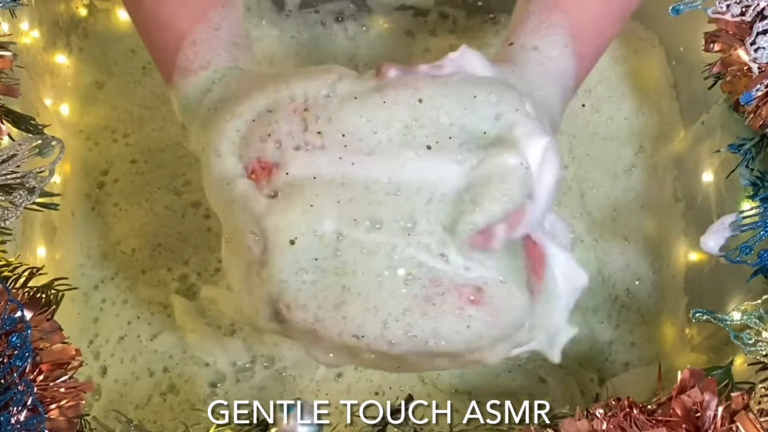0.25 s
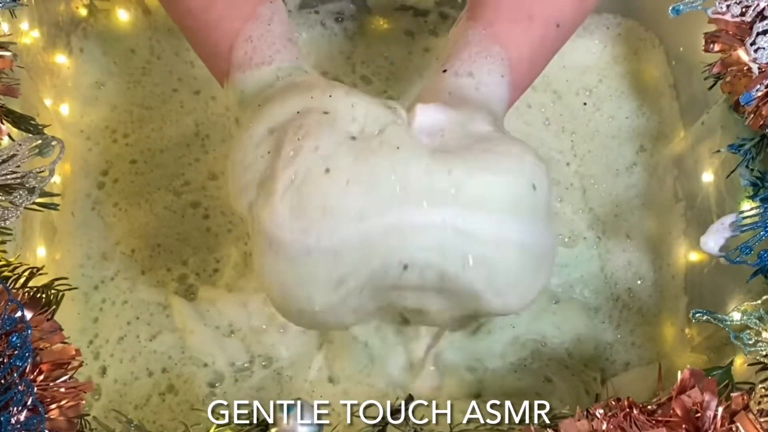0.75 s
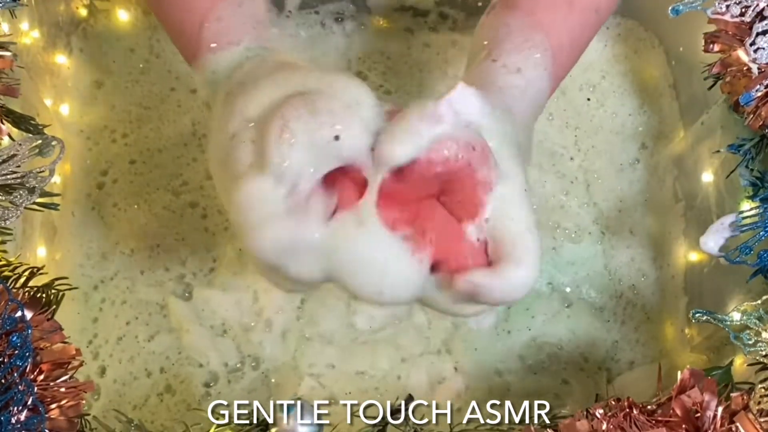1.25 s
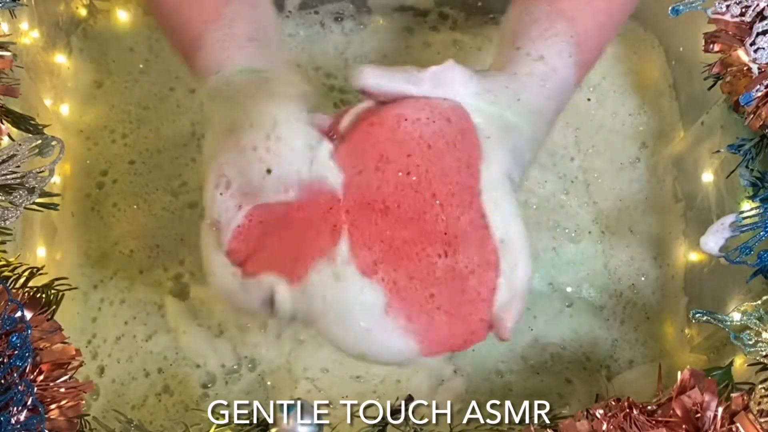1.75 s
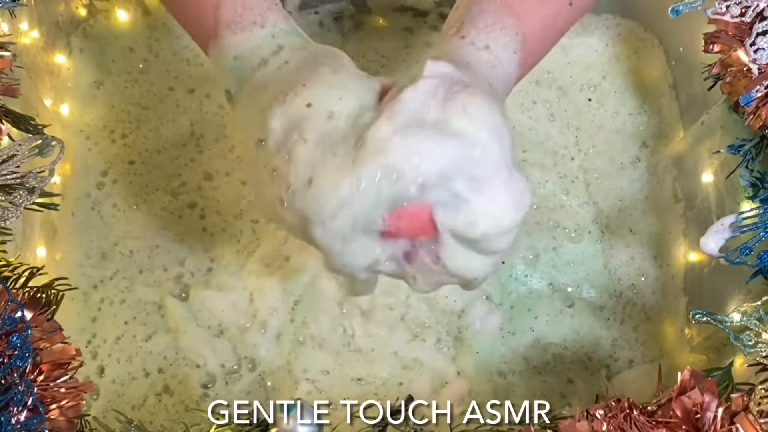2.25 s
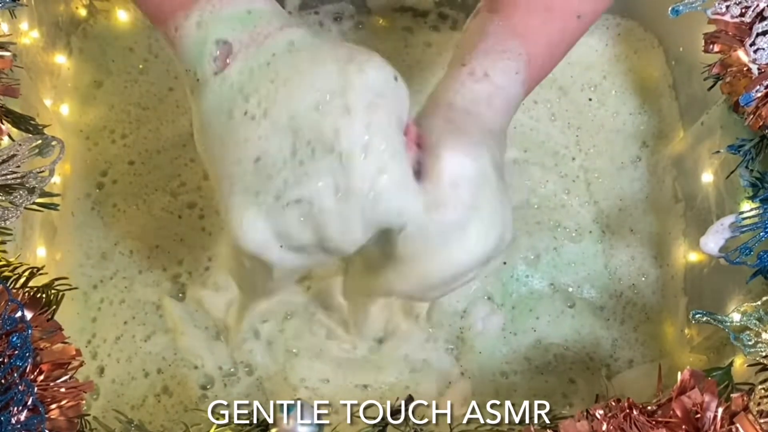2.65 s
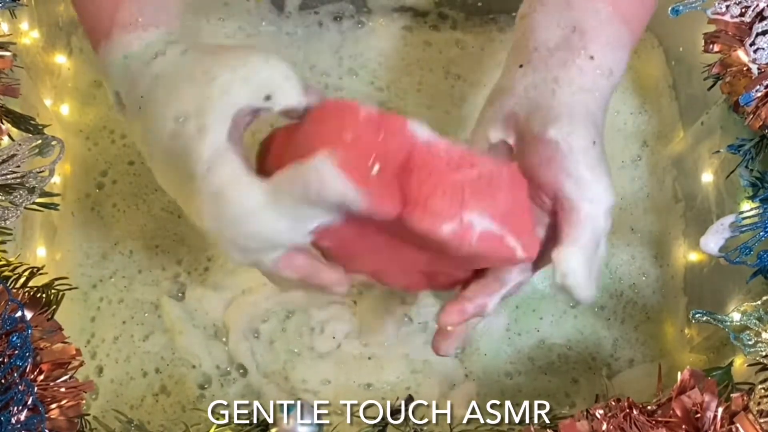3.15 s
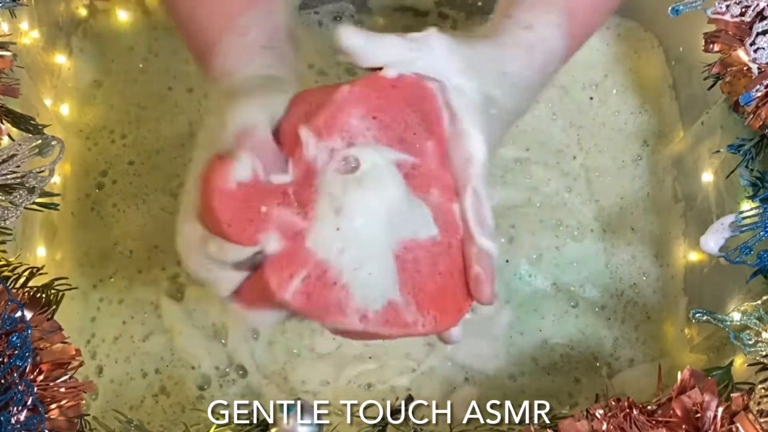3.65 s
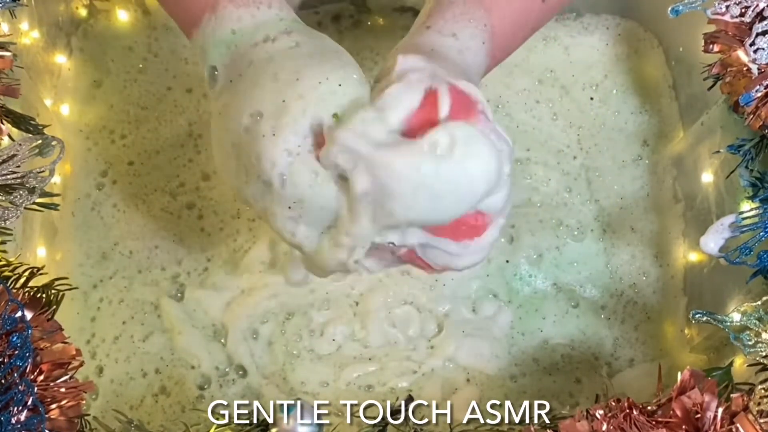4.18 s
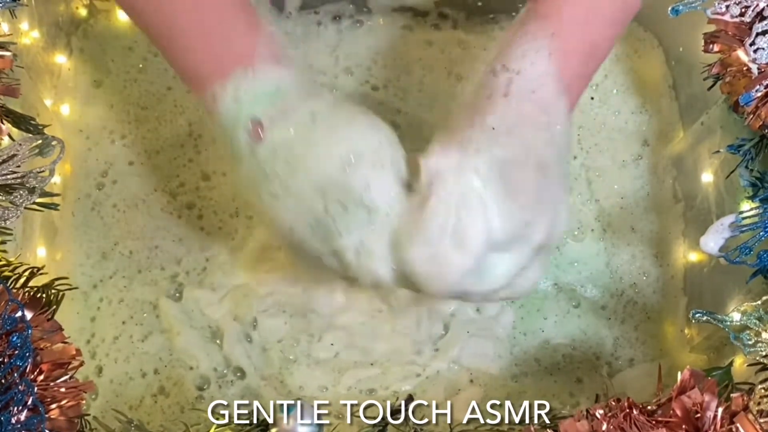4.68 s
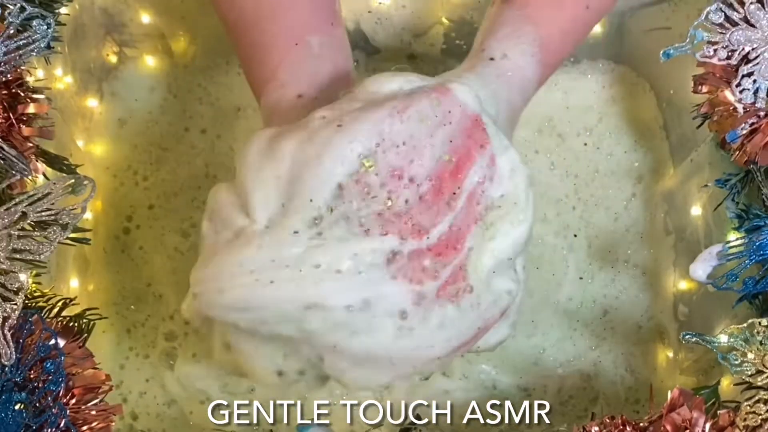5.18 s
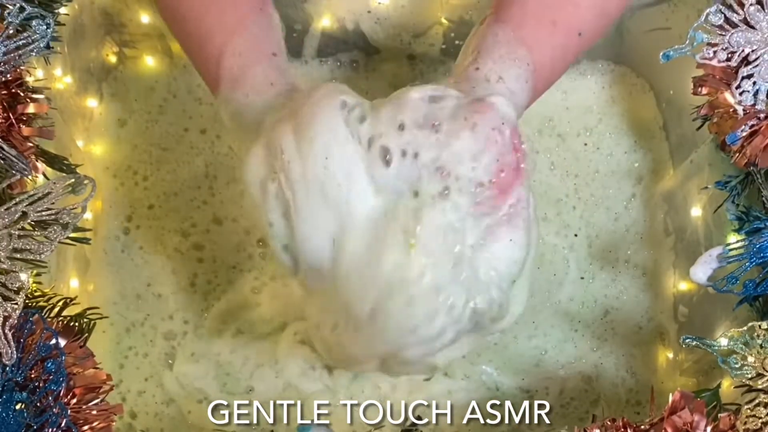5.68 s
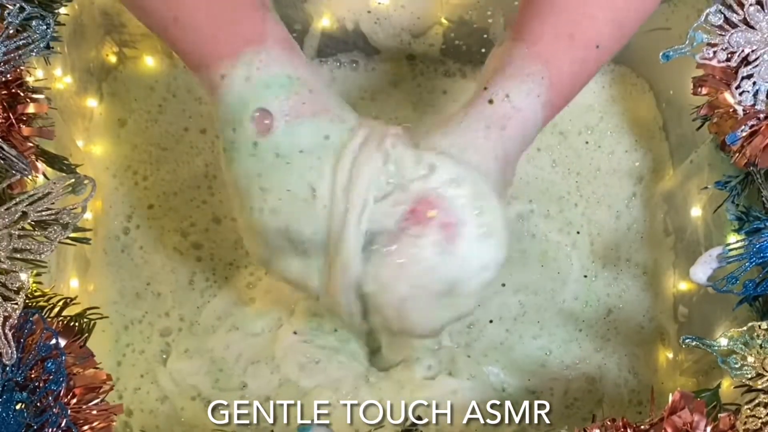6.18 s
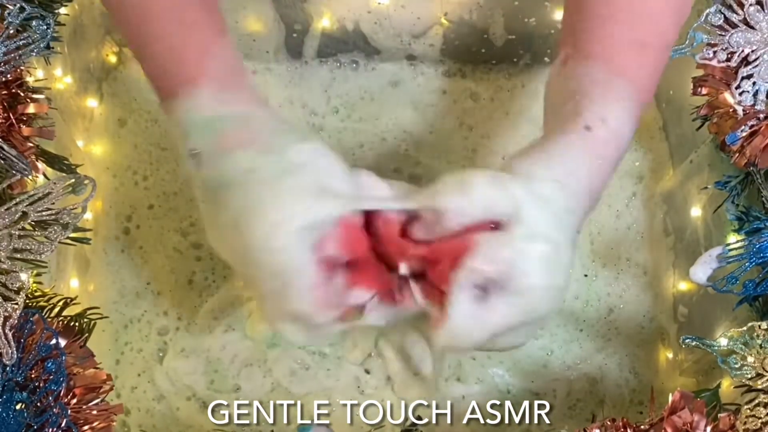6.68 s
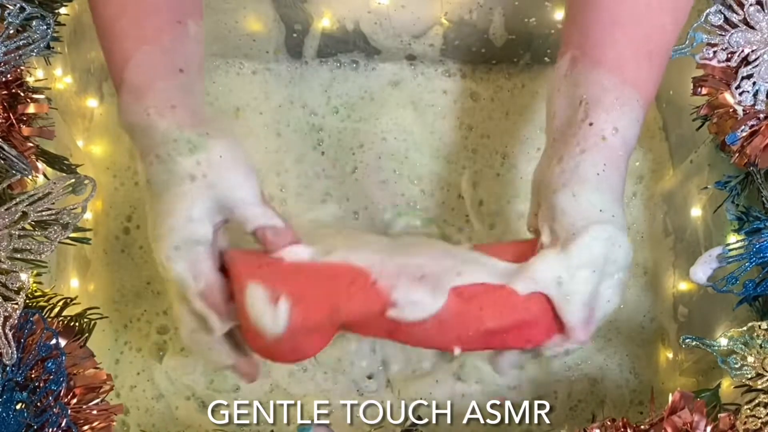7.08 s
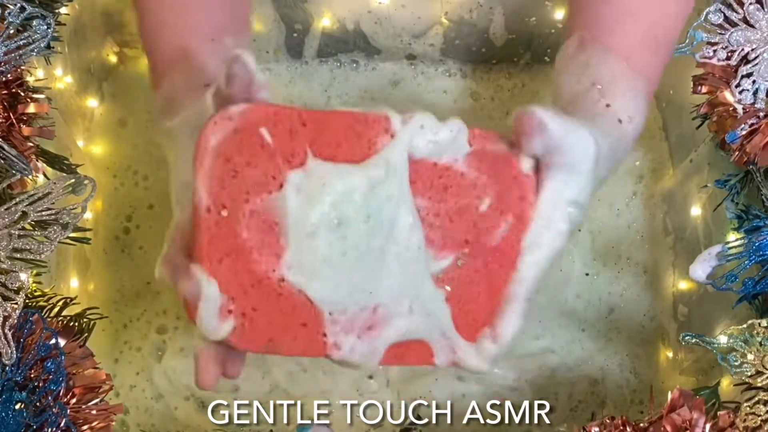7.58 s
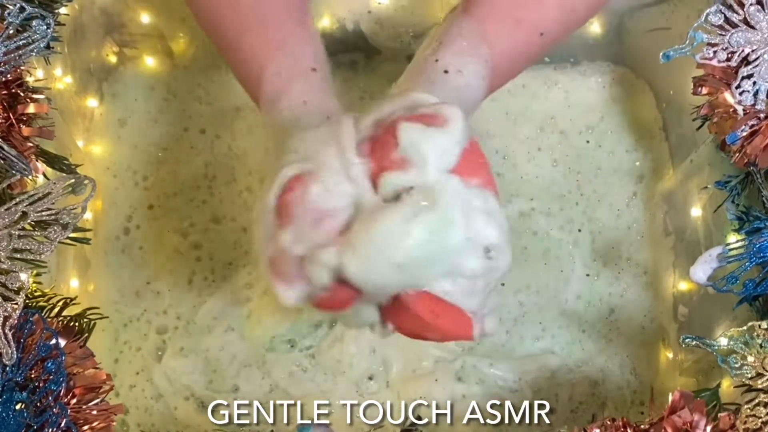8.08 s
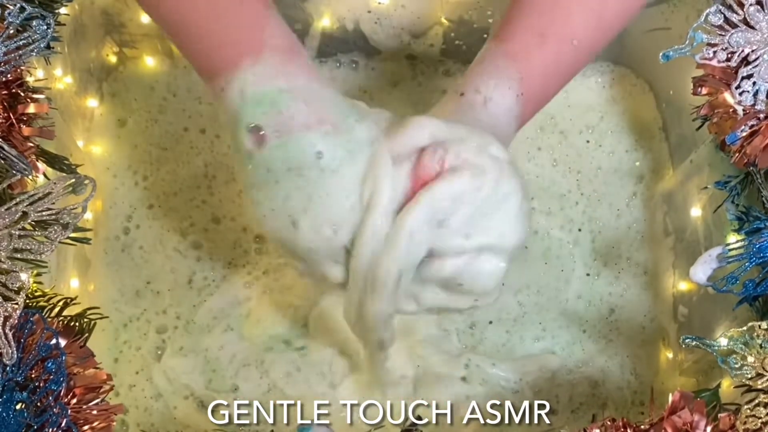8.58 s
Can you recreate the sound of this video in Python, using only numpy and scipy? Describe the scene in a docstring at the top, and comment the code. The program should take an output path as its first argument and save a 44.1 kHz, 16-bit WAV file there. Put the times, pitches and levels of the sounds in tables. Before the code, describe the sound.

Close-up soapy sponge kneading: surges of fine foam fizz and squelching bubbles, with gurgles, crisp air-pocket pops and near-quiet lulls between.

```python
"""Squeezing a soapy sponge

Two hands squeeze and release a sponge full of thick soap foam over a basin of suds, close to one microphone.
Bursting soap films tick so densely that they merge into a fizz, and wet bubbles squelch and slosh.
Trapped air gurgles through the suds, air pockets snap between the fingers and blobs of foam plop.
Short ringing bubbles, clicks and filtered noise make these sounds; the basin and the room answer them."""
import sys
import numpy as np
from scipy import signal
from scipy.fft import rfft, irfft, next_fast_len
from scipy.io import wavfile

SR = 44100
rng = np.random.default_rng(int(sys.argv[2]) if len(sys.argv) > 2 else 0)


def materialize(psi):
    """Save the field psi as 16-bit PCM at rate SR to the path in sys.argv[1].

    A 1-D psi becomes a single channel; in a 2-D psi each row is a channel.
    """
    bounded = np.clip(np.atleast_2d(psi).T, -1, 1)
    quanta = np.round(bounded * 32767).astype(np.int16)
    wavfile.write(sys.argv[1], SR, quanta)


N = 389623  # length in samples
TOP_HZ = 15850  # nothing is kept above this frequency

# All levels are relative: they come before the gains inside each sound, the basin and the echoes.
# The hands press the sponge. Each row: start in seconds, rise in seconds, hold in seconds,
# fade by 20 dB in seconds, fizz level in dB, fizz brightness in dB, squelch level in dB,
# squelch pitch in Hz (before it sinks), slosh level in dB.
SQUEEZE_ROWS = [(-.04, .26, .04, .3, -51.5, -2, -50.5, 1750, -61),
                (.34, .14, 0.092, .36, -70, 5, -56.5, 1350, -56.5),
                (1.58, .125, .045, .24, -45.5, 3.7, -51.5, 2050, -61.5),
                (1.85, .16, 0.0918, .22, -55.5, 6.5, -58.5, 1200, -69),
                (3.45, .1, .16, .43, -48, 3.2, -53.5, 2000, -64),
                (3.871, .14, 0.071, .27, -55, 0.5, -58.5, 2000, -67),
                (4.87, .12, 0.223, 0.6073, -53.3, -1, -52, 1750, -60.5),
                (5.375, .13, .05, .45, -59.5, -7.5, -56.5, 1550, -60.5),
                (5.87, .09, .01, 0.4065, -67, -12, -68, 2000, -64),
                (7.54, .15, .16, .35, -46, 1, -53, 1850, -65.5),
                (7.95, .13, .07, .4, -57, -2.5, -52.7, 1600, -55.5),
                (8.28, .1, .14, .4, -69, 2, -65, 1350, -61)]
# The grip opens and the sponge swells, drawing air. Each row: start in seconds, rise in seconds,
# hold in seconds, fade by 20 dB in seconds, fizz level in dB, fizz brightness in dB, slosh level in dB.
RELEASE_ROWS = [(.65, .03, .11, .12, -67.5, 8, -75), (1.046, .007, .012, 0.1349, -59, 9.5, -59),
                (1.072, .05, 0.022, 0.3945, -60, -12.5, -66), (1.19, .11, .02, .28, -53.5, 3.5, -75),
                (2.561, .025, 0.087, 0.53, -60, -2, -73), (2.64, .09, .1, .2, -58, 2, -73),
                (2.92, .14, .11, 0.2558, -60, 1.5, -80.5), (4.44, .14, 0.029, 1.03, -63, 0, -72),
                (4.627, .08, .02, .25, -56.5, -6.5, -64), (6.508, .018, 0.0434, 0.23, -56.5, -6.5, -60.5),
                (6.54, .11, .05, 0.37, -54, 1.5, -70), (6.86, .1, .03, .18, -55.5, -2.5, -69),
                (7.08, .06, .08, .35, -60.5, -0.5, -69), (7.36, .06, .02, .04, -58.5, 5, -66),
                (7.45, .05, .08, .1, -67, -3, -76), (8.68, .08, 0.091, 1.93, -58.5, 1.5, -68.5)]
# Air forced through the suds. Each row: start in seconds, rise in seconds, hold in seconds,
# fade by 20 dB in seconds, level in dB, bubble pitch in Hz, level in dB of the slosh it stirs up.
GURGLE_ROWS = [(1.76, .1, .08, .12, -59, 780, -63), (3.655, .07, .03, .04, -44, 900, -50),
               (4.18, .1, .1, .2, -65, 1700, -69), (4.88, .06, .14, 0.03, -53.5, 1100, -63.5),
               (4.99, .14, .025, .15, -42.5, 1900, -59), (7.758, .018, 0.0974, .15, -40, 900, -54)]
# Air pockets that burst. Each row: time in seconds, crack level in dB, body level in dB, body pitch in Hz,
# build-up of the tearing before the burst in seconds, decay of the spray after it in seconds.
SNAP_ROWS = [(.373, -37, -54.5, 2500, .0002, 0.00049), (.518, -40, -36.5, 1300, 0.00029, 0.0022),
             (0.5962, -40.5, -43.5, 378, .0027, 0.0052), (.783, -65.5, -43, 1520, 0.00095, 0.00293),
             (0.884, -46, -41, 800, 0.002, 0.0021), (.945, -62, -45.5, 645, .0003, 0.00093),
             (.98, -46.5, -47.5, 900, 0.00052, 0.0083), (1.0503, -28, -48, 400, 0.00019, 0.00142),
             (1.119, -43.5, -43.5, 298, .0005, 0.00216), (1.136, -42.5, -41, 2410, .005, 0.0063),
             (2.33, -46, -38.5, 890, 0.0032, .0033), (2.355, -44, -53.5, 400, .005, .004),
             (2.4585, -60.5, -43, 670, 0.00032, 0.00287), (2.563, -32, -30, 660, 0.0019, 0.00284),
             (2.731, -36.5, -36, 1430, 0.00245, 0.00376), (3.407, -42.5, -61.5, 3000, .0002, .0004),
             (3.437, -44.5, -60, 3000, 0.00021, 0.00043), (4.2145, -43.5, -39, 2000, 0.00032, 0.00297),
             (4.293, -46, -46.5, 2600, 0.0019, 0.0019), (4.313, -61.5, -41, 2000, 0.00039, 0.00193),
             (4.3625, -68.5, -40.5, 2390, 0.00197, 0.0043), (4.4331, -59, -42.5, 1600, 0.00032, 0.00104),
             (4.5791, -33.5, -37, 1540, 0.00118, 0.0056), (4.797, -45, -50, 1500, .0003, 0.00097),
             (5.648, -40.5, -50.5, 350, 0.00103, 0.00187), (5.8112, -44, -36, 1900, .0005, .002),
             (5.8155, -33, -25, 1600, .0004, .0026), (5.823, -39.5, -37, 1850, 0.0022, 0.0024),
             (6.5201, -44, -36, 1300, 0.00278, 0.0027), (7.128, -43.5, -49, 1500, 0.0034, 0.0031),
             (7.281, -42, -64, 1500, .003, 0.00216), (7.8328, -24, -44.5, 800, 0.00107, 0.00098),
             (8.4851, -28.5, -27.5, 3300, 0.00188, 0.00245), (8.5071, -36, -33, 740, 0.00194, 0.00327),
             (8.667, -50, -32, 1045, 0.00022, 0.00123), (8.687, -51.5, -41, 2830, 0.0025, 0.0023)]
# Blobs of foam that land in the basin. Each row: time in seconds, level in dB, starting pitch in Hz.
PLOP_ROWS = [(0.651, -49.5, 150), (.882, -43, 151), (0.945, -42, 385), (.987, -46, 250),
             (2.328, -42, 169.8), (2.4591, -46.5, 297), (2.56, -42.5, 149), (4.397, -44.5, 168.4),
             (4.401, -42.5, 414), (5.732, -46, 302), (5.814, -38.5, 520), (5.97, -43.5, 210),
             (5.991, -47, 170), (8.094, -40.5, 280), (8.484, -37.5, 149.6), (8.506, -40, 335),
             (8.825, -42.5, 260)]
# The hands bump the sponge as they spread it. Each row: start in seconds, rumble level in dB.
BUMP_ROWS = [(6.9, -70), (7.115, -59.5), (7.23, -68), (7.3, -68)]
# How every bump swells and fades. The one row: rise in seconds, hold in seconds, fade by 20 dB in seconds.
BUMP_TIMES = (.012, .02, .08)
# Tone colours of the bursting films, the snaps, the handling rumble and the quiet air.
# Each row: frequency in Hz, relative level in dB per Hz.
FIZZ_COLOUR = [(300, -19.5), (900, -4), (1800, 0.5), (2800, 1.5), (4200, 0), (6500, -3.5), (10000, -4.5),
               (12500, -9.5), (15500, -19)]
CRACK_COLOUR = [(150, -21), (700, -1.5), (2000, 2.5), (3400, 1.5), (5500, -1.5), (10000, -3.5),
                (15500, -24)]
RUMBLE_COLOUR = [(10, -11), (28, 5.5), (50, 0), (90, -10.5), (160, -25), (400, -52), (2000, -85.5)]
AIR_COLOUR = [(30, -12), (120, 5.5), (250, -9), (500, -5), (2000, -16.5), (8000, -8.5), (15500, -12.5)]
# Resonances and hollows of the basin. Each row: frequency in Hz, width in Hz, boost or cut in dB.
BASIN_TONES = [(147.9, 9.4, -2), (199.8, 27.3, -1.5), (260, 17.8, 6.5), (478, 58.4, 5.5), (641, 242, -2.5),
               (860, 130, 1)]
# How long the basin's quick echoes last. Each row: frequency in Hz, time to fade by 60 dB in seconds.
WALL_DECAY = [(200, 0.0406), (2000, 0.0404), (14000, 0.025)]
# How long the room's echoes last. Each row: frequency in Hz, time to fade by 60 dB in seconds.
ROOM_DECAY = [(150, 0.26), (1000, 0.091), (4000, 0.337), (14000, 0.13)]

# air leaves first, then wet bubbles, then thick suds: extra rise in seconds, and a factor on the fade
SQUELCH_LAG_S, SQUELCH_LINGERS = 0.029, 1.45
SLOSH_LAG_S, SLOSH_LINGERS = 0.0524, 1.82
# bubbles grow as the sponge runs out of air: their pitch sinks by this share over this many seconds
SAG_SHARE, SAG_S = 0.2944, 0.463
# bubbles drawn back in: level relative to the fizz, pitch
REFILL_SQUELCH_DB, REFILL_HZ = -3.5, 1807
# foam left to itself
REST_FIZZ_DB, REST_SQUELCH_DB, REST_HZ, REST_SLOSH_DB = -70.5, -68.5, 1750, -73.5
RUMBLE_DB = -76
DIP_S, DIP_WIDTH_S, DIP_DB = 4.765, 0.0133, -26  # the level dips briefly


def amp(db):
    """Turn decibels into gain."""
    return 10 ** (np.asarray(db) / 20)


def power(db):
    """Turn decibels into power."""
    return amp(db) ** 2


def level(p):
    """Turn power into decibels."""
    return 10 * np.log10(p)


def unit(x):
    """Scale a sound to an average strength (rms) of 1."""
    return x / np.sqrt(np.mean(x ** 2) + 1e-20)


def along(points, hz):
    """Read values between (Hz, value) points on a logarithmic frequency axis."""
    f, v = np.transpose(points)
    return np.interp(np.log(hz + 1), np.log(f + 1), v)


def highpass(x, order, cut_hz):
    """Take away the bass below cut_hz."""
    return signal.sosfilt(signal.butter(order, cut_hz, "high", fs=SR, output="sos"), x)


def coloured(x, spectrum, size=2048):
    """Filter x to a spectrum with unit energy and no ringing ahead, so clicks keep their sharp fronts."""
    # folding the cepstrum forward in time gives the filter its earliest possible response
    cepstrum = irfft(np.log(amp(along(spectrum, np.fft.rfftfreq(size, 1 / SR)))))
    cepstrum[1:size // 2] *= 2
    cepstrum[size // 2 + 1:] = 0
    response = irfft(np.exp(rfft(cepstrum)))
    return signal.fftconvolve(x, response / np.linalg.norm(response))[:len(x)]


def add(track, s, sound):
    """Mix a sound into the track at time s."""
    start = int(np.clip(round(s * SR), 0, N))
    track[start:start + len(sound)] += sound[:N - start]


def stroke(start, rise, hold, fade, ease=.95, size=16):
    """Power of one movement: it swells smoothly to 1, holds, then fades by 20 dB every fade seconds."""
    age = np.arange(0, N, size) / SR - start
    swell = (.5 - .5 * np.cos(np.pi * np.clip(age / rise, 0, 1))) ** ease
    dying = amp(-20 * np.maximum(age - rise - hold, 0) / fade)
    return np.repeat((swell * dying) ** 2, size)[:N]


def avalanches(rate, life, depth):
    """A gain of rms 1 that jumps when one burst sets off its neighbours, then dies away in life seconds."""
    starts = (rng.random(N) < rate / SR) * np.minimum(rng.exponential(size=N), 3.5) ** 2
    activity = signal.lfilter([1], [1, -np.exp(-1 / (life * SR))], starts)
    return unit(np.sqrt(1 + depth * activity))


def ticks(rate, scatter_db):
    """Random clicks of uneven size, rms 1, at a rate per second that may vary."""
    chance = np.clip(rate / SR, 1e-4, 1)
    sizes = amp(scatter_db * np.clip(rng.standard_normal(N), -3, 2.3)) * rng.choice([-1, 1], N)
    # dividing by the root of the chance keeps the strength even when the rate varies
    return unit((rng.random(N) < chance) * sizes / np.sqrt(chance))


def bubbles(rate, pitch_hz, spread, cycles, scatter_db, glide, size=400):
    """Bubbles, rms 1: each rings for a few cycles and rises in pitch as it nears the surface."""
    at = np.flatnonzero(rng.random(N) < rate / SR)
    tune, strength, sign = rng.standard_normal((len(at), 3)).T[:, :, None]
    hz = np.minimum(np.broadcast_to(pitch_hz, N)[at, None] * np.exp(spread * tune), TOP_HZ)
    turns = hz * np.arange(size) / SR
    age = np.minimum(turns / cycles, 1)  # 0 at birth, 1 after the last cycle
    loudness = amp(scatter_db * np.clip(strength, -2, 2) - 60 * age)
    rings = np.sign(sign) * loudness * np.sin(2 * np.pi * turns * (1 + glide * age))
    places = at[:, None] + np.arange(size)
    return unit(np.bincount(places.ravel(), (rings * (age < 1)).ravel(), N + size)[:N])


def kneading():
    """Add up air (fizz), wet bubbles (squelch) and thick suds (slosh); stronger flows weigh more in the tone."""
    air, wet, thick = (np.full(N, power(db)) for db in (REST_FIZZ_DB, REST_SQUELCH_DB, REST_SLOSH_DB))
    # resting foam collapses in stray clusters
    collapse = avalanches(rate=14, life=.012, depth=2.5) ** 2
    wet, thick = wet * collapse, thick * collapse
    # brightness and pitch are summed weighted by power, then averaged at the end
    shine, pitch = np.zeros(N), REST_HZ * wet
    for s, rise, hold, fade, fizz_db, bright_db, squelch_db, hz, slosh_db in SQUEEZE_ROWS:
        flow = power(fizz_db) * stroke(s, rise, hold, fade)
        pressed = power(squelch_db) * stroke(s, rise + SQUELCH_LAG_S, hold, fade * SQUELCH_LINGERS)
        emptied = np.clip((np.arange(N) / SR - s) / SAG_S, 0, 1)
        air += flow
        shine += bright_db * flow
        wet += pressed
        pitch += hz * (1 - SAG_SHARE * emptied) * pressed
        thick += power(slosh_db) * stroke(s, rise + SLOSH_LAG_S, hold, fade * SLOSH_LINGERS)
    for *shape, fizz_db, bright_db, slosh_db in RELEASE_ROWS:
        swell = stroke(*shape)
        flow = power(fizz_db) * swell
        drawn = power(fizz_db + REFILL_SQUELCH_DB) * swell
        air += flow
        shine += bright_db * flow
        wet += drawn
        pitch += REFILL_HZ * drawn
        thick += power(slosh_db) * swell
    for *shape, _, _, slosh_db in GURGLE_ROWS:
        thick += power(slosh_db) * stroke(*shape)
    return level(air), shine / air, level(wet), pitch / wet, level(thick)


def fizz(level_db, bright_db, rate=5000, crowding=1.0, hiss_db=-5, ping_db=-8, gain_db=1.8144,
         split_hz=7500, big_db=-70):
    """Soap films burst as tiny ticks: the louder the foam, the denser they crowd, up to a hiss."""
    films = ticks(rate * amp(crowding * (level_db + 61)), scatter_db=5.5)
    foam = unit(coloured(films + amp(hiss_db) * rng.standard_normal(N), FIZZ_COLOUR))
    # opened cells ping like tiny bottles
    pings = bubbles(rate=1300, pitch_hz=4191, spread=0.5261, cycles=22.5, scatter_db=4.0, glide=0.028, size=700)
    foam = unit(foam + amp(ping_db) * pings)
    # single avalanches stand out only while few films burst
    exposed = 1 / (1 + amp(level_db + 59.0))
    foam = foam * (1 - exposed + exposed * avalanches(rate=54, life=0.0032, depth=1.92))
    # a bare sponge sounds bright, a coat of suds muffles the finest ticks
    coarse = signal.sosfiltfilt(signal.butter(2, split_hz, fs=SR, output="sos"), foam)
    foam = coarse * amp(-.2 * bright_db) + (foam - coarse) * amp(0.8 * bright_db)
    # air rushing into the bare pores bursts the very finest films
    finest_colour = [(3000, -37.5), (8000, -9), (12500, -0.5), (15500, -3.5)]
    finest = unit(coloured(ticks(rate=6000, scatter_db=1.5), finest_colour))
    foam = foam + amp(-21 + np.clip(bright_db, -10, 3) + 0.28 * (level_db + 49.5)) * finest
    # now and then a large film on the surface bursts with a crisp click of its own
    big_colour = [(300, -12), (1500, -1.5), (4000, 3.5), (11000, -4.0), (15500, -18)]
    big = unit(coloured(ticks(rate=68, scatter_db=6.5), big_colour))
    return amp(level_db + gain_db) * foam + amp(big_db + 0.63 * (level_db + 60.5)) * big


def squelch(level_db, pitch_hz, gain_db=-0.5):
    """Bubbles pop out of the pores in clumps."""
    pops = bubbles(rate=2800, pitch_hz=pitch_hz, spread=0.3998, cycles=8.83, scatter_db=4.0, glide=0.164, size=600)
    return amp(level_db + gain_db) * avalanches(rate=99, life=0.003, depth=0.35) * pops


def slosh(level_db, gain_db=-2, low_cut_hz=95):
    """Thick suds ooze between the fingers in large, slow bubbles."""
    blobs = bubbles(rate=600, pitch_hz=343.6, spread=0.512, cycles=7.9, scatter_db=3.0, glide=0.069, size=2200)
    return amp(level_db + gain_db) * highpass(blobs, 2, low_cut_hz)


def background(air_db=-72):
    """Filtered noise gives a handling rumble, which swells at each bump, and the quiet air of the room."""
    bumps = sum(power(db) * stroke(s, *BUMP_TIMES) for s, db in BUMP_ROWS)
    handling = np.sqrt(power(RUMBLE_DB) + bumps)
    rumble = handling * coloured(rng.standard_normal(N), RUMBLE_COLOUR, size=8192)
    return rumble + amp(air_db) * coloured(rng.standard_normal(N), AIR_COLOUR)


def snaps(ring_cycles=4, click_db=4, spray_db=-7, tear_db=-8):
    """A pocket's wall tears in a swelling spray of noise, then bursts, and the cavity rings briefly."""
    out = np.zeros(N)
    t = np.arange(-SR // 50, SR // 20) / SR  # the burst is at t = 0
    after = np.maximum(t, 0)
    for s, crack_db, body_db, hz, rise, fall in SNAP_ROWS:
        tearing = np.exp(-np.abs(t) / np.where(t < 0, rise, fall))
        spray, flutter = rng.standard_normal((2, len(t)))
        crack = coloured(amp(click_db) * (t == 0) + amp(spray_db) * tearing * spray, CRACK_COLOUR)
        cavity = [(hz / 8, -14), (hz / 2, -4), (hz, 0), (hz * 2, -8), (hz * 8, -36)]
        body = amp(tear_db) * coloured(tearing * flutter, cavity)
        body += amp(-60 * after * hz / ring_cycles) * np.sin(2 * np.pi * hz * after)
        add(out, s + t[0], amp(crack_db) * crack + amp(body_db) * body)
    return out


def plops(cycles=7, glide=0.076, splat_db=-16, splat_t60=0.056):
    """A soft blob traps a pocket of air that rings for a few cycles, rising slightly, over a dull splat."""
    out = np.zeros(N)
    t = np.arange(SR // 8) / SR
    splat_colour = [(100, -12.5), (700, 0), (2500, -21.5), (9000, -40.5)]
    for s, db, hz in PLOP_ROWS:
        age = t * hz / cycles
        pocket = amp(-60 * age) * np.sin(2 * np.pi * hz * t * (1 + glide * age))
        noise = amp(splat_db - 60 * t / splat_t60) * rng.standard_normal(len(t))
        add(out, s, amp(db) * (pocket + coloured(noise, splat_colour)))
    return out


def gurgles(gain_db=-1, spread_per_hz=.00019):
    """Trapped air breaks through in a quick run of bubbles; large, low ones are more alike."""
    out = np.zeros(N)
    for *shape, level_db, pitch_hz, _ in GURGLE_ROWS:
        run = bubbles(rate=600, pitch_hz=pitch_hz, spread=spread_per_hz * pitch_hz, cycles=15.2,
                      scatter_db=2.0, glide=0.12, size=800)
        out += amp(level_db + gain_db) * np.sqrt(stroke(*shape)) * run
    return out


def basin(x):
    """The basin strengthens or weakens a few tones of everything that sounds inside it."""
    for hz, width, db in BASIN_TONES:
        x = x + (amp(db) - 1) * signal.lfilter(*signal.iirpeak(hz, hz / width, SR), x)
    return x


def echoes(x, decay, gap, size=8192):
    """A diffuse tail of unit energy, gap seconds late; its pattern keeps changing as the hands move."""
    starts = np.arange(0, N - size, size // 2)
    # each tail is noise whose frequencies fade at their own pace
    hz, t, z = signal.stft(rng.standard_normal((len(starts), size)), SR, nperseg=256)
    tails = signal.istft(z * amp(-60 * t / along(decay, hz)[:, None]), SR, nperseg=256)[1]
    tails = tails / np.linalg.norm(tails, axis=1, keepdims=True)
    # overlapping pieces of the sound each get a tail of their own
    pieces = x[starts[:, None] + np.arange(size)] * signal.windows.cosine(size)
    answers = signal.fftconvolve(pieces, tails, axes=1)
    out = np.zeros(N)
    for start, answer in zip(starts, answers):
        add(out, start / SR + gap, answer)
    return out


def scene(walls_db=-13.0, room_db=-19, small_cut_hz=380):
    """All sounds reach one microphone, the same in both ears."""
    fizz_db, bright_db, squelch_db, pitch_hz, slosh_db = kneading()
    foam = fizz(fizz_db, bright_db) + squelch(squelch_db, pitch_hz) + gurgles()
    # small bubbles radiate little bass
    foam = highpass(foam, 1, small_cut_hz)
    bursts = highpass(snaps() + plops(), 1, 60)
    close = basin(foam + slosh(slosh_db) + bursts)
    walls = amp(walls_db) * echoes(close, WALL_DECAY, gap=.0007)
    room = amp(room_db) * echoes(close, ROOM_DECAY, gap=.005)
    mono = close + walls + room + background()
    return np.array([mono, mono])


def record(dry):
    """The level dips briefly once; nothing is kept above the band limit."""
    distance = (np.arange(N) / SR - DIP_S) / DIP_WIDTH_S
    dip = amp(DIP_DB / (1 + distance ** 2) ** 1.35)
    size = next_fast_len(N + 8192)
    passed = np.fft.rfftfreq(size, 1 / SR) < TOP_HZ
    return irfft(rfft(dry * dip, size) * passed, size)[:, :N]


dry = scene()
out = record(dry)
materialize(out)
```